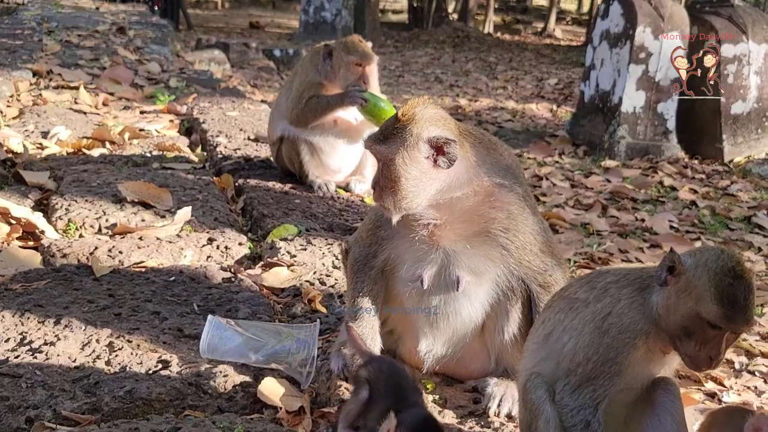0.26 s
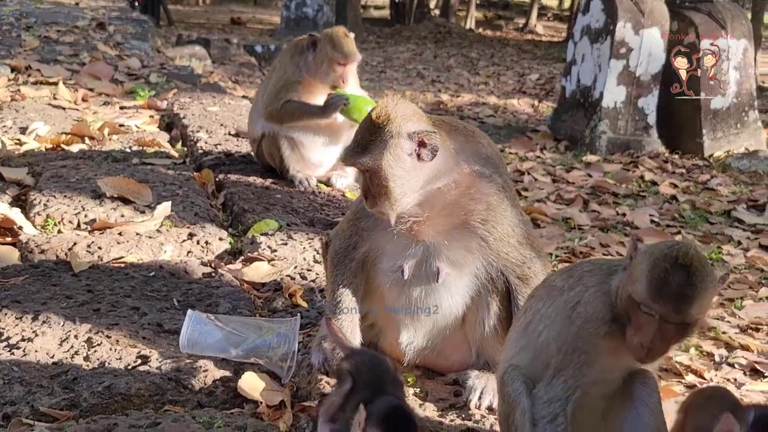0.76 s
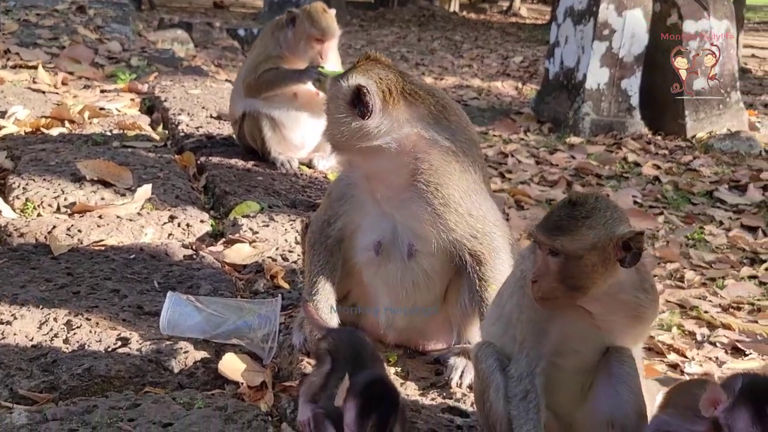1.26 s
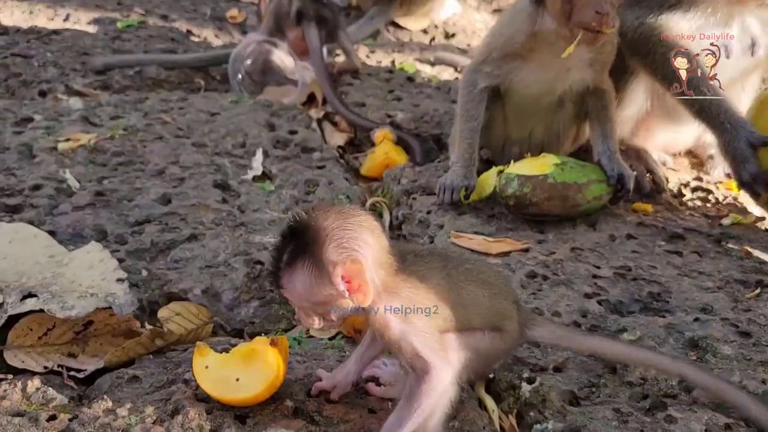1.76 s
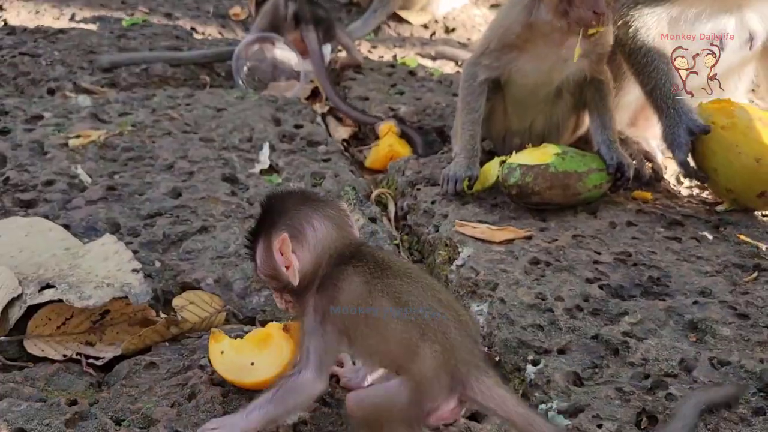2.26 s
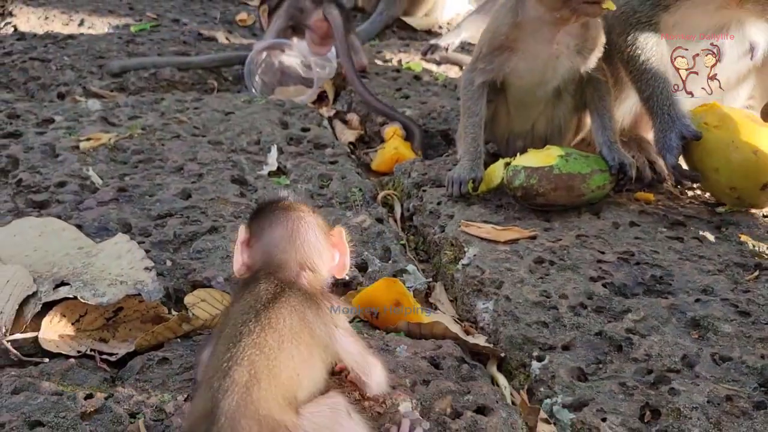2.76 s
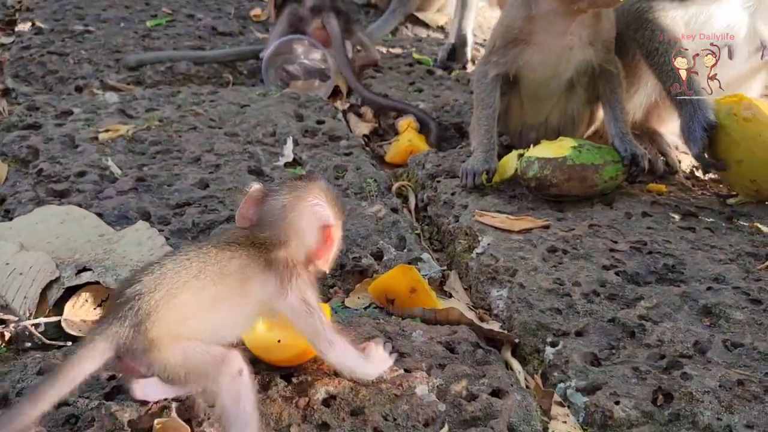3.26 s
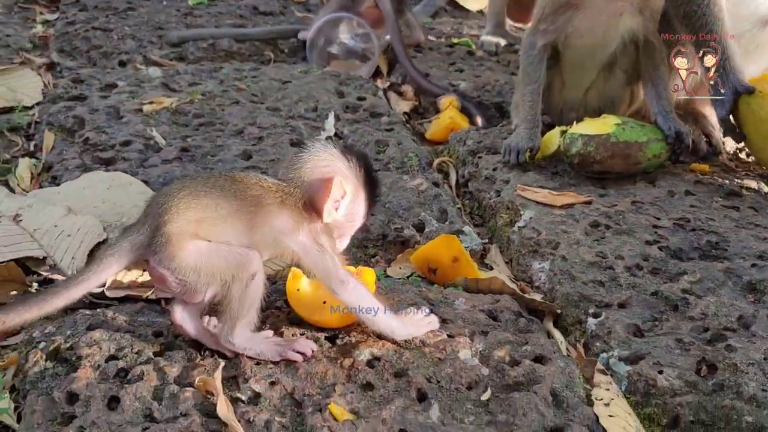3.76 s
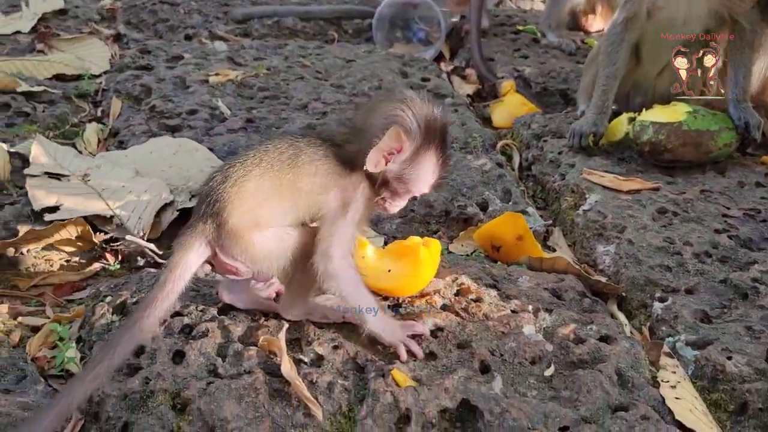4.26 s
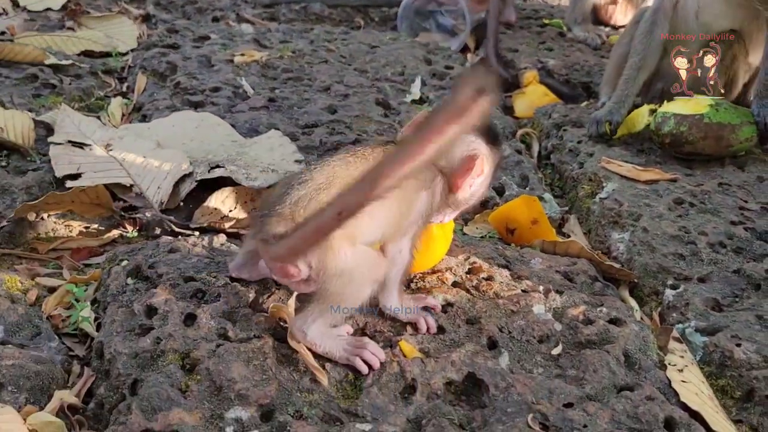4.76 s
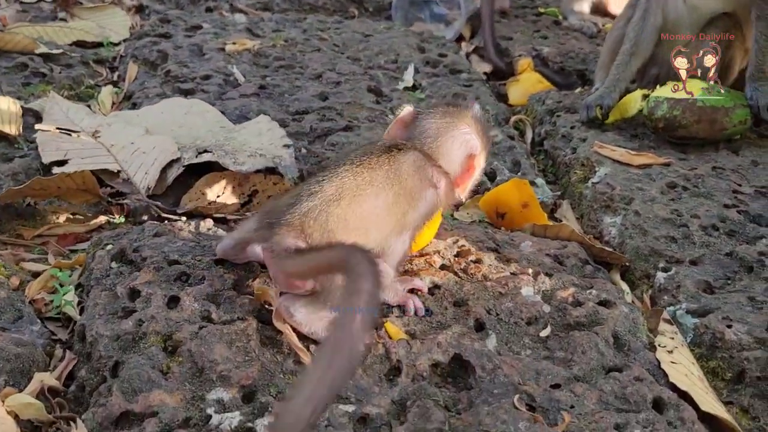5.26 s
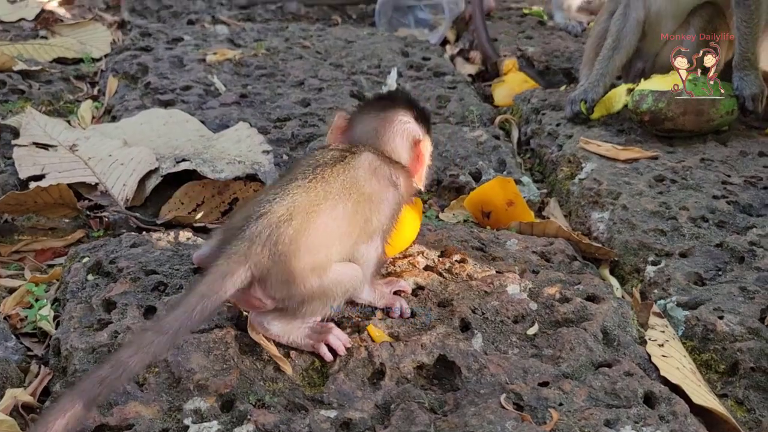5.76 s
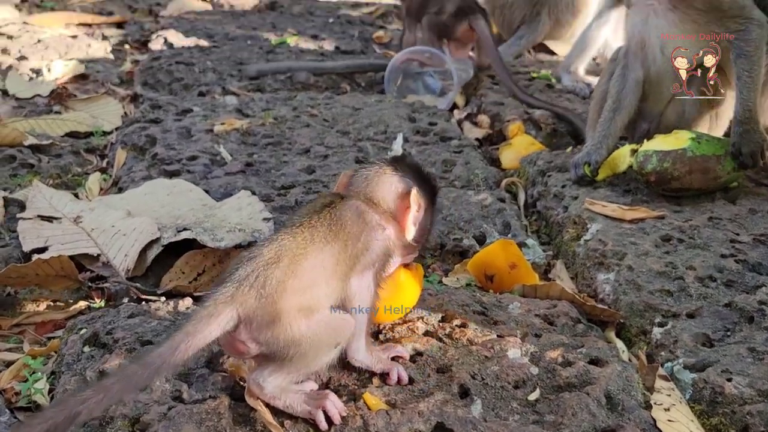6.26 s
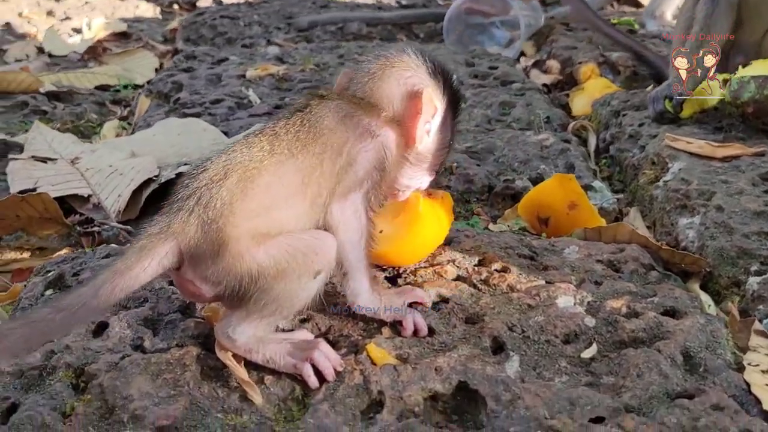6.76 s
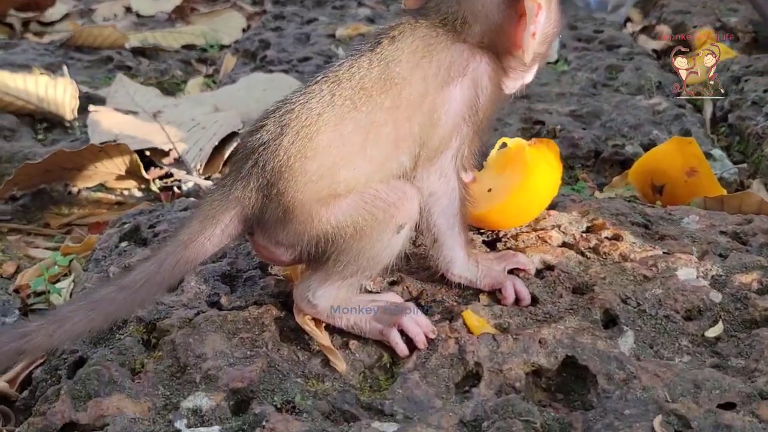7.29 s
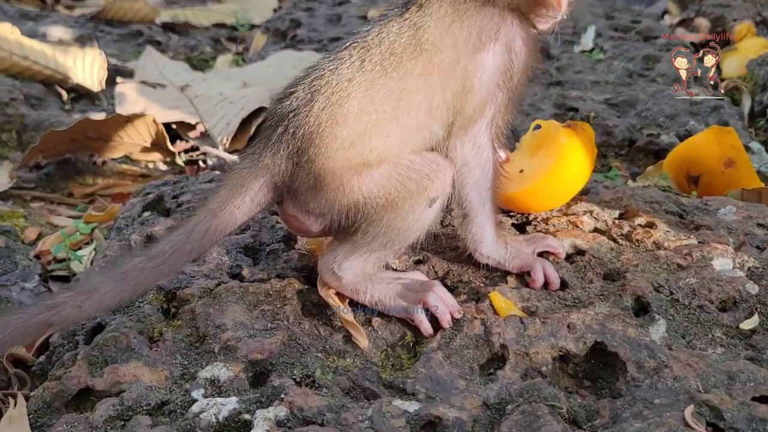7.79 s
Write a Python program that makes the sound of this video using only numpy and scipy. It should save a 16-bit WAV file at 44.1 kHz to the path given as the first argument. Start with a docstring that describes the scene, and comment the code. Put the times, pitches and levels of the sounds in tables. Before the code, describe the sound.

Quiet woodland ground, close up: dry leaves crackle, sharp clicks break out, mouths smack fruit, a young monkey coos briefly, and insects buzz behind.

```python
"""A stone slab among dry leaves in woodland, where macaques feed close to a phone held low.
Near it, leaf strokes are crackling noise, snaps are noise bursts with ringing twigs, taps are decaying modes;
mouths and paws smack in narrow noise, wet peel squeaks and bumps thud as short tones, a young monkey coos once
in harmonics. Beyond, a bird whistles dipping tones and one insect ticks in rasps of noise while another hisses;
shaped noise makes the rustle further off, the air in the trees and the low rumble."""
import sys
import numpy as np
from scipy import signal
from scipy.fft import rfft, irfft, next_fast_len
from scipy.io import wavfile
from scipy.ndimage import uniform_filter1d

SR = 44100
rng = np.random.default_rng(int(sys.argv[2]) if len(sys.argv) > 2 else 0)


def output_pcm(signal):
    """Save a mono or channel-first signal as 16-bit PCM at the path in sys.argv[1].

    Samples are clipped to [-1, 1] before scaling.
    """
    pcm = np.clip(np.atleast_2d(signal).T, -1, 1) * 32767
    wavfile.write(sys.argv[1], SR, np.round(pcm).astype(np.int16))


N = 354119
TIME = np.arange(N) / SR
HIT_SIZE = 4096  # samples in a short sound
HIT_TIME = np.arange(HIT_SIZE) / SR
LONG_HIT_TIME = np.arange(4 * HIT_SIZE) / SR


def amp(db):
    """Decibels to gain."""
    return 10 ** (np.asarray(db) / 20)


def unit(x):
    """Scale to rms 1."""
    return x / np.sqrt(np.mean(x ** 2) + 1e-20)


def burst(x):
    """Scale a short sound to the energy of 10 ms at rms 1."""
    return unit(x) * np.sqrt(.01 * SR / x.shape[-1])


def curves(table):
    """Each column of a table of (seconds, ..) rows at every sample."""
    s, *columns = np.transpose(table)
    return [np.interp(TIME, s, column) for column in columns]


def over_hz(points, size):
    """A (Hz, value) table at the bins of a spectrum, joined along log frequency."""
    hz, value = np.transpose(points)
    return np.interp(np.log(np.fft.rfftfreq(size, 1 / SR) + 1), np.log(hz), value)


def colour(x, points):
    """Filter by a (Hz, dB) spectrum."""
    size = next_fast_len(x.shape[-1])
    return irfft(rfft(x, size) * amp(over_hz(points, size)), size)[..., :x.shape[-1]]


def band(x, lo_hz, hi_hz, order=2):
    """Causal band-pass."""
    return signal.sosfilt(signal.butter(order, [lo_hz, hi_hz], "band", fs=SR, output="sos"), x)


def pan(db):
    """Left and right gains, left minus right in dB, of equal total power."""
    gains = amp(np.array([[.5], [-.5]]) * db)
    return gains / np.sqrt(np.mean(gains ** 2, axis=0))


def ears(phase):
    """Phase in radians at the left and right ports, which a sound reaches out of step."""
    return np.array([[0], [phase]])


def walk(rate):
    """Smooth random wander of rms 1, drawn afresh about rate times a second."""
    k = max(int(SR / rate), 2)
    return unit(uniform_filter1d(np.repeat(rng.standard_normal(N // k + 1), k), k)[:N])


def waver(x, drift, rate):
    """Let the pitch of a stereo sound wander by the share drift."""
    at = np.arange(N)
    warped = at + np.cumsum(drift * walk(rate))
    return np.array([np.interp(warped % N, at, channel) for channel in x])


def swell(s, half):
    """A smooth rise and fall around time s."""
    return np.exp(-((TIME - s) / half) ** 2 / 2)


def phrases(table):
    """Gain of a voice that grows, holds and fades at steady dB rates in each phrase."""
    gains = []
    for start, end, db, rise, fall in table:
        before, after = np.maximum(start - TIME, 0), np.maximum(TIME - end, 0)
        gains.append(amp(db - rise * before - fall * after))
    return np.max(gains, axis=0)


def crackle(rate, spread_db):
    """Dense tiny crackles, rate of them a second on average, whose sizes vary by spread_db."""
    struck = rng.random(N) < rate / SR
    sizes = amp(spread_db * np.minimum(rng.exponential(size=N), 5)) * struck
    envelope = np.sqrt(np.abs(uniform_filter1d(sizes ** 2, size=24)))
    return unit(envelope * rng.standard_normal((2, N)))


def add(out, s, sound):
    """Mix a short sound in at time s."""
    i = int(s * SR)
    out[:, i:i + sound.shape[1]] += sound[:, :N - i]


# How alike the two ports hear sound from all round. Each row: frequency in Hz, correlation.
PORT_LIKENESS = [(130, .75), (290, 0), (640, -.6), (1400, -.6), (3100, 0), (15000, 0)]


def diffuse():
    """Stereo noise arriving from all round, as mid and side balanced by the likeness of the ports."""
    size = next_fast_len(N)
    mid, side = rfft(rng.standard_normal((2, size)))
    alike = np.clip(over_hz(PORT_LIKENESS, size), -1, 1)
    mid, side = mid * np.sqrt(1 + alike), side * np.sqrt(1 - alike)
    return irfft(np.array([mid + side, mid - side]), size)[:, :N]


# Spectrum of the deep rumble. Each row: frequency in Hz, relative level in dB.
RUMBLE_COLOUR = [(20, -48), (27, -26), (34, 0.5), (46, -7), (70, 3), (100, -3.5), (130, -7), (160, -10),
                 (200, -17.5), (300, -27), (500, -73)]
# Its swells. Each row: strongest moment in seconds, level in dB, half length in seconds.
RUMBLE_SWELLS = [(1.856, -48, 0.043), (2.058, -41.5, 0.051), (2.437, -45, 0.11), (2.924, -48.5, 0.07),
                 (3.086, -43, 0.009), (3.43, -47.5, 0.024), (4.16, -49.5, 0.042), (5.135, -45, 0.027),
                 (5.375, -45, 0.045), (5.532, -44.5, 0.04), (6.05, -47.5, 0.025), (6.326, -41, 0.044),
                 (6.48, -46.5, 0.035), (7.785, -46.5, 0.014), (8.023, -42, 0.024)]


def rumble():
    """A deep outdoor rumble, low noise that swells now and then over a steady floor."""
    power = amp(-52) ** 2 + sum((amp(db) * swell(s, half)) ** 2 for s, db, half in RUMBLE_SWELLS)
    return unit(colour(diffuse(), RUMBLE_COLOUR)) * np.sqrt(power) * pan(.057)


# Spectrum of the distant foliage. Each row: frequency in Hz, relative level in dB.
FOLIAGE_COLOUR = [(200, -1.5), (450, 1.5), (750, 2.5), (1200, -1.5), (2150, -6), (2700, -4.5), (3600, -11),
                  (4600, -15), (7300, -18), (9600, -19), (13000, -20.5), (15800, -26)]


def foliage():
    """Distant stirring foliage, a broad soft noise whose level wanders."""
    return unit(colour(diffuse(), FOLIAGE_COLOUR)) * amp(-61.5 + 1.3 * walk(12)) * pan(-1.5)


# Low wash of air in the trees. Each row: time in seconds, level in dB before the gain.
WASH = [(0, -68.5), (1.75, -106), (2.21, -66.5), (4.34, -70), (5.39, -59.5), (6.3, -63.5), (6.64, -74),
        (7.29, -64), (8.03, -77)]


def air_in_trees():
    """Air in the trees, a low band of noise that comes and goes."""
    gain_db, wander_db = 4, 2
    level_db, = curves(WASH)
    return unit(band(diffuse(), 212, 369)) * amp(level_db + gain_db + wander_db * walk(5.1)) * pan(-1.5)


# Rustling further off. Each row: strongest moment in seconds, level in dB before the gain,
# centre in Hz, half length in seconds.
STIRS = [(0.03, -64, 1440, .05), (0.08, -67, 1640, .07), (0.313, -67.5, 2920, 0.11),
         (0.21, -59.5, 1700, 0.043), (0.353, -58, 1750, .06), (0.443, -55.5, 1710, .02),
         (0.37, -61.5, 970, .09), (0.52, -56, 1160, 0.027), (0.619, -58, 1410, 0.036),
         (0.63, -61, 1040, 0.065), (0.77, -49.5, 1070, 0.043), (1.524, -71, 3650, 0.32),
         (1.838, -58, 777, 0.086), (2.59, -62.5, 1200, 0.12), (3.02, -62, 1216, 0.23)]


def stirs():
    """Other monkeys shift about further off: soft, narrow swells of rustle that waver and break into patches."""
    width, drift = 1.08, .02  # band edges as a ratio to the centre, share of pitch
    gain_db, patchy_db = -1, 1.8
    out, noise = 0, diffuse()
    for s, db, hz, half in STIRS:
        rustle = unit(waver(band(noise, hz / width, hz * width), drift, rate=16))
        out = out + rustle * amp(db + gain_db + patchy_db * walk(24.13)) * swell(s, half)
    return out * pan(-7.5)


# Thin high hiss of a second insect. Each row: strongest moment in seconds, level in dB, half length in seconds.
SHRILL_SWELLS = [(5.95, -64, 0.53), (5.485, -57, .07), (5.662, -51.5, 0.028), (5.82, -58, 0.052),
                 (6.03, -52, 0.032), (6.235, -50, 0.025), (6.314, -50, 0.048), (6.42, -53, .045)]


def shrill():
    """A very high, grainy insect hiss that comes in swells, its narrow band drifting a little."""
    centre_hz, width_hz, drift = 13650, 520, .007
    grains = crackle(rate=1500, spread_db=2)
    grains = band(grains, centre_hz - width_hz / 2, centre_hz + width_hz / 2)
    # shift the whole band up and down by a wandering number of Hz
    shift = np.exp(2j * np.pi * np.cumsum(centre_hz * drift * walk(12)) / SR)
    drifting = (signal.hilbert(grains, next_fast_len(N))[:, :N] * shift).real
    effort = np.sqrt(sum((amp(db) * swell(s, half)) ** 2 for s, db, half in SHRILL_SWELLS))
    return unit(drifting) * effort * pan(-.41)


# The rasps of one wing stroke. Each row: delay into the stroke in seconds, relative level in dB,
# share that reaches the ring in dB, favoured pitch in Hz, fall away from it in dB per octave, fade in seconds.
WING_RASPS = [(0, 4.5, -4, 9800, 6, .003), (0.012, 2.5, -9.5, 7700, 22, .005), (.026, -8, 0, 9000, 6, .005)]


def wing_strokes():
    """Slightly uneven strokes: the sample and the force in dB of each rasp, one row a stroke."""
    stroke_s, first_s, jitter_s, scatter_db = .04363, .004, .0006, 2
    starts = np.arange(first_s, TIME[-1] - stroke_s, stroke_s)[:, None]
    late, rasp_db = np.transpose(WING_RASPS)[:2]
    shape = len(starts), len(late)
    times = starts + late + jitter_s * rng.standard_normal(shape)
    at = (np.clip(times, 0, TIME[-1]) * SR).astype(int)
    return at, rasp_db + scatter_db * rng.standard_normal(shape)


# Resonances of the wings. Each row: centre in Hz, width in Hz, relative level in dB.
WING_MODES = [(5100, 900, -6), (6500, 600, -8), (7280, 380, 0), (7750, 400, 1), (8550, 500, 0),
              (9220, 450, 1), (10000, 450, -2), (11000, 450, -11), (12350, 700, -4), (13600, 700, -6)]


def wing_chirr(at, force_db):
    """Each rasp sets off noise in the wing resonances, which wax and wane; also gives the top one's envelope."""
    rise_s, mode_scatter_db, wax_db = .0003, 3, 2.2
    focus_hz, focus_db, fade_s = np.transpose(WING_RASPS)[3:]
    fades = (1 - np.exp(-HIT_TIME / rise_s)) * np.exp(-HIT_TIME / fade_s[:, None])
    chirr = 0
    for hz, width, db in WING_MODES:
        favour_db = db - focus_db * np.abs(np.log2(hz / focus_hz))
        uneven_db = mode_scatter_db * rng.standard_normal(at.shape) + wax_db * walk(5)[at]
        sizes = amp(force_db + favour_db + uneven_db)
        envelope = np.zeros((1, N))
        for stroke, k in np.ndindex(at.shape):
            add(envelope, at[stroke, k] / SR, sizes[stroke, k] * fades[k:k + 1])
        noise = unit(band(rng.standard_normal((2, N)), hz - width / 2, hz + width / 2))
        chirr = chirr + envelope * noise
    return unit(chirr), envelope


# Spectrum of the hiss scattered by foliage. Each row: frequency in Hz, relative level in dB.
HAZE_COLOUR = [(2300, -12.5), (3100, -12), (3700, -3), (4400, -2.5), (5200, -4), (6700, -1), (7300, -6),
               (8200, -2), (9200, 2.5), (10500, -4), (11700, 0), (12500, 0), (14000, -0.5), (15500, -19)]


def wing_haze():
    """The insect's hiss as the foliage scatters it, flickering slowly and fast."""
    return unit(colour(diffuse(), HAZE_COLOUR)) * amp(-6.5 + walk(4.5) + walk(120))


def wing_drone(envelope):
    """Noise in two bands among the wing resonances, only partly pulsed by the strokes."""
    noise = diffuse()
    drone = band(noise, 7270, 7630) + amp(-3.5) * band(noise, 8650, 9600)
    return unit(drone * np.sqrt(envelope + envelope.mean()))


# Thin ring of the wings. Each row: pitch in Hz, relative level in dB.
WING_RINGS = [(2700, -6.5), (3620, -12)]
# When the ring is heard. Each row: full from and full until in seconds, level in dB,
# rise and fall in dB per second.
RING_PHRASES = [(5.465, 5.5, -60.5, 300, 402), (5.8, 7.1, -65.5, 28, 3), (6.51, 6.65, -59.5, 298, 150),
                (6.765, 6.87, -60, 300, 99), (7.03, 7.04, -63, 400, 300), (7.33, 7.39, -63.5, 298, 300),
                (7.55, 7.61, -61, 320, 198), (7.82, 7.83, -63, 299, 197)]


def wing_ring(at, force_db):
    """Each rasp sets off decaying tones, blurred by the foliage into narrow noise."""
    decay_s, blur_db = .0054, -5
    share_db = np.transpose(WING_RASPS)[2]
    ring, blur, pulses = 0, diffuse(), np.zeros(N)
    pulses[at] = amp(force_db + share_db)
    for hz, db in WING_RINGS:
        tone = np.sin(2 * np.pi * hz * HIT_TIME) * np.exp(-HIT_TIME / decay_s)
        beads = unit(signal.oaconvolve(pulses, tone)[:N])
        ring = ring + amp(db) * (beads + amp(blur_db) * unit(band(blur, hz - 100, hz + 100)))
    return ring * phrases(RING_PHRASES)


# The ticking insect. Each row: full from and full until in seconds, level in dB of the effort,
# its rise and fall in dB per second.
INSECT_PHRASES = [(3.68, 3.85, -69, 34, 23), (4.7, 5.3, -70, 26, 20), (5.76, 5.9, -54, 34, 14),
                  (6.52, 6.83, -49, 13, 16.5)]


def insect():
    """Wings open and close about 23 times a second: three uneven rasps a stroke, haze, drone and a thin ring."""
    effort = phrases(INSECT_PHRASES)
    peak = effort.max()
    share = effort / peak
    at, force_db = wing_strokes()
    chirr, envelope = wing_chirr(at, force_db)
    # haze and drone grow more slowly with effort than the rasps do
    chirr = chirr * peak * share ** 1.15
    haze = wing_haze() * peak * share ** .7
    drone = wing_drone(envelope) * amp(-60) * share ** .4
    return (chirr + haze + drone + wing_ring(at, force_db)) * pan(-7)


# One whole whistle, dipping and rising. Each row: time from its start in seconds,
# pitch in Hz before the note's ratio, relative level in dB.
WHISTLE = [(0, 5800, -16), (.01, 6450, -2), (.05, 5850, 1), (.085, 5300, -7), (.11, 5060, -11),
           (.13, 5250, -6), (.155, 5520, 0), (.18, 6150, -1), (.205, 7000, -9), (.22, 7200, -24)]
# The bird's notes. Each row: start of the whistle in seconds (if sung from its beginning), level in dB
# before the gain, first and last second of the whistle that are sung, speed, pitch ratio.
BIRD = [(2.586, -45, 0, .22, 1, 1), (3.757, -51, 0, .22, 1, 1), (4.17, -64, .15, .22, 1, 1.13),
        (5.798, -56, 0, .11, 3, .97), (5.884, -59.5, 0, .08, 3, .97), (5.968, -54.5, 0, .22, 1, .99),
        (7.085, -64, 0, .08, 1, 1.07), (7.09, -60.5, .11, .19, 1, .97), (7.258, -57.5, 0, .22, 1, 1)]


def bird():
    """A nearly pure whistle, whole or in part; fainter notes come from further off, more scattered by the trees."""
    gain_db, side_db, ear_phase = 5, -6.5, .81
    unsteady, flutter_db = .016, 3  # share of pitch, dB
    near_db, broken_per_db = -45, .25  # notes fainter than this break up more
    echo_s, echo_db, middle_db, echo_follows = .038, -3, -56, .6
    song, scattered = np.zeros((2, 2, N))
    at, hz, db = np.transpose(WHISTLE)
    for s, level_db, first, last, speed, ratio in BIRD:
        t = np.arange(first * SR, last * SR, speed) / SR
        pitch = np.interp(t, at, hz) * ratio * (1 + unsteady * walk(810)[:len(t)])
        broken_db = broken_per_db * (near_db - level_db) * (walk(137)[:len(t)] - .5)
        flutter = flutter_db * walk(87.4)[:len(t)]
        loudness = amp(np.interp(t, at, db) + flutter + broken_db) * signal.windows.tukey(len(t), .1)
        note = np.sin(2 * np.pi * np.cumsum(pitch) / SR + ears(ear_phase)) * loudness * pan(side_db)
        add(song, s + first / speed, note * amp(level_db))
        # the scattered sound fades less with distance than the direct one
        add(scattered, s + first / speed, note * amp(middle_db + echo_follows * (level_db - middle_db)))
    t = LONG_HIT_TIME
    trees = unit(rng.standard_normal((2, len(t))) * np.exp(-t / echo_s)) / np.sqrt(len(t))
    echo = signal.fftconvolve(scattered, trees, axes=1)[:, :N]
    return amp(gain_db) * (song + amp(echo_db) * echo)


# Pitch of the young monkey's coo. Each row: time in seconds, fundamental in Hz.
COO_PITCH = [(5.685, 457), (5.725, 539), (5.742, 702), (5.76, 686), (5.774, 607), (5.8, 577), (5.82, 522),
             (5.85, 505), (5.87, 594), (5.89, 533), (5.92, 330)]
# Its loudness. Each row: time in seconds, fundamental and second harmonic in dB before the gains.
COO_LEVEL = [(5.679, -56, -53), (5.694, -62, -52), (5.726, -45, -51), (5.74, -52, -59), (5.752, -57, -61),
             (5.768, -42, -53), (5.802, -42.5, -52), (5.854, -41.5, -43), (5.884, -41.5, -49),
             (5.915, -60, -62), (5.92, -60, -69)]


def coo():
    """A young monkey's husky coo: a faint rising start, a break, then a firm wavering note, two harmonics strong."""
    gain_db, second_db, third_db, husk_db = 5, -1, -28, -13
    jitter, shimmer_db, second_shimmer_db, edge_s = .045, 1.8, 3.5, .005
    hz, = curves(COO_PITCH)
    first, second = amp(curves(COO_LEVEL))
    inside = np.minimum(TIME - COO_LEVEL[0][0], COO_LEVEL[-1][0] - TIME)
    sung = np.clip(inside / edge_s, 0, 1)
    phase = 2 * np.pi * np.cumsum(hz * (1 + jitter * walk(400))) / SR + ears(1.75)
    husk = amp(husk_db) * unit(band(diffuse(), 250, 960))
    low = first * (np.sin(phase) + amp(third_db) * np.sin(3 * phase) + husk)
    high = second * amp(second_db + second_shimmer_db * walk(140)) * np.sin(2 * phase)
    return (low + high) * sung * amp(gain_db + shimmer_db * walk(160)) * pan(-10.5)


# Weight shifting close by. Each row: start in seconds, level in dB before the slow rise and decay,
# pitch in Hz, decay in seconds.
BUMPS = [(2.215, -28.5, 85, 0.012), (4.688, -30.5, 73, 0.015), (5.52, -47, 84, 0.021),
         (6.279, -33, 78, 0.027), (7.083, -31, 83, 0.0067), (7.427, -37.5, 85.5, 0.041)]


def bumps():
    """Weight shifts close by: a few cycles of deep thud, a decaying low sine."""
    out, t, rise_s = np.zeros((2, N)), LONG_HIT_TIME, .0045
    for s, db, hz, decay in BUMPS:
        envelope = np.exp(-t / decay) * (1 - np.exp(-t / rise_s))
        add(out, s, amp(db) * np.sin(2 * np.pi * hz * t) * envelope * pan(-2.6))
    return out


# Colour of sliding dry leaves. Each row: frequency in Hz, relative level in dB.
LEAF_COLOUR = [(1290, -15.5), (2200, -14), (2730, -8), (3190, -12), (3460, -4.5), (4260, -10), (6700, -3),
               (7340, -8.5), (8580, 0), (9950, -8), (12600, -2), (14200, 0), (15800, -9)]
# Leaves stroked along the ground. Each row: strongest moment in seconds, hiss in dB and
# hollow scrape in dB (both before the gains), half length in seconds.
LEAF_STROKES = [(0.544, -56.5, -54, 0.044), (0.634, -46.5, -57.5, 0.07), (0.805, -44, -55.5, 0.057),
                (0.97, -51, -74, 0.037), (1.198, -49.5, -86, 0.069), (1.543, -71.5, -88, 0.11),
                (1.965, -62.5, -65, 0.04), (2.239, -50.5, -73, 0.013), (3.063, -64, -81, 0.028),
                (5.34, -63.5, -79, 0.062)]


def leaf_strokes():
    """Dry leaves slide in strokes, a fine crackling hiss over a hollow scrape, with faint sliding between."""
    hiss_gain_db, scrape_gain_db = 3, 2
    hiss_flicker_db, scrape_flicker_db, drift = 1.2, 2.9, .09
    bed = np.clip((2.25 - TIME) / .08, 0, 1)  # the faint sliding ends at 2.25 s
    hiss, scrape = amp(-69.5) * bed, amp(-71) * bed
    for s, hiss_db, scrape_db, half in LEAF_STROKES:
        hiss = np.hypot(hiss, amp(hiss_db) * swell(s, half))
        scrape = np.hypot(scrape, amp(scrape_db) * swell(s, half))
    slide = unit(colour(crackle(rate=7900, spread_db=.5), LEAF_COLOUR))
    slide = slide * hiss * amp(hiss_gain_db + hiss_flicker_db * walk(40.83))
    hollow = unit(waver(band(diffuse(), 834, 1306), drift, rate=22))
    hollow = hollow * scrape * amp(scrape_gain_db + scrape_flicker_db * walk(43.05))
    return slide * pan(-2) + hollow * pan(-5)


# Colour of the crackling noise around snaps. Each row: frequency in Hz, relative level in dB.
CRACKLE_COLOUR = [(900, 0), (1500, -0.5), (2800, -1), (4200, -7.5), (9000, -10.5), (15000, -18)]
# Its short swells. Each row: strongest moment in seconds, level in dB, half length in seconds.
CRACKLE_SWELLS = [(2.164, -53, 0.043), (2.179, -28.5, 0.0076), (2.204, -44, 0.037), (2.645, -55, 0.05),
                  (3.025, -48, 0.033), (4.004, -51.5, 0.033), (4.664, -51, 0.055), (5.132, -50, 0.033)]


def crackle_swells():
    """Short swells of crackling noise around some of the snaps."""
    level = sum(amp(db) * swell(s, half) for s, db, half in CRACKLE_SWELLS)
    return unit(colour(crackle(rate=6100, spread_db=1.5), CRACKLE_COLOUR)) * level


# Squeaks of wet peel close by. Each row: strongest moment in seconds, peak in dB before panning,
# pitch in Hz, half length in seconds.
SQUEAKS = [(5.742, -50, 1590, .009), (5.861, -51, 1950, .012), (6.037, -53, 1550, 0.0044),
           (6.036, -50, 2780, .004), (6.18, -51, 1560, 0.012), (6.961, -59, 2090, .004),
           (6.985, -54, 2050, 0.0043)]


def squeaks():
    """Wet peel slips for a moment: a tiny, unsteady note."""
    unsteady = .04  # share of pitch
    out, t, slip = np.zeros((2, N)), HIT_TIME, walk(500)
    for s, db, hz, half in SQUEAKS:
        pitch = hz * (1 + unsteady * np.roll(slip, -int(s * SR))[:HIT_SIZE])
        note = np.sin(2 * np.pi * np.cumsum(pitch) / SR + ears(1.7))
        add(out, s - 3 * half, note * np.exp(-(t / half - 3) ** 2 / 2) * amp(db) * pan(-8))
    return out


# Mouths and paws close by. Each row: strongest moment in seconds, level in dB, centre in Hz,
# half length in seconds, left minus right in dB.
SMACKS = [(2.06, -43, 466, 0.0035, -16), (2.163, -48.5, 1350, 0.035, -3), (2.192, -54, 1190, 0.013, -2),
          (3.591, -44, 905, 0.01, -8.5), (3.622, -38, 990, 0.0046, -5), (3.652, -52.5, 900, 0.01, -2),
          (3.898, -54, 570, 0.0042, -19), (4.055, -54, 570, 0.013, -15), (4.162, -48, 505, 0.012, -26),
          (4.204, -55, 560, 0.0062, -12), (4.59, -46.5, 756, 0.011, 4), (4.608, -35.5, 735, 0.0029, 1),
          (4.641, -52.5, 1070, 0.019, 0), (4.826, -50, 362, 0.0082, -2), (4.852, -44.5, 360, 0.0086, -23),
          (5.508, -30.5, 386, 0.0019, -11.5), (5.524, -40, 427, 0.0079, -5),
          (5.549, -36.5, 435, 0.0021, -6), (5.593, -46.5, 484, 0.0095, 19), (5.851, -33.5, 394, 0.0019, -9),
          (6.039, -43, 416, 0.0082, -5.5), (6.085, -43, 360.0, 0.0081, -7), (6.212, -41, 464, 0.012, -5),
          (6.241, -44, 390, 0.0051, -6), (6.282, -48, 320, 0.015, -14), (6.371, -43.5, 400, 0.017, -6.5),
          (6.395, -28.5, 328, 0.0023, -10), (6.43, -41, 370, 0.0058, -8), (6.959, -51.5, 706, 0.02, 2),
          (6.988, -40.5, 575, 0.0065, -3.5), (7.145, -47.5, 464, 0.02, -9.5), (7.159, -44, 503, 0.0056, -5),
          (7.244, -53.5, 292, 0.018, -26), (7.333, -59.5, 765, 0.049, -2), (7.445, -54, 446, 0.021, -16),
          (7.485, -53, 332, 0.0081, -12)]


def smacks():
    """Soft pulp and paws give way: a brief swell of friction in one hollow resonance, with a little wet edge."""
    width, wet_db, alike = 1.275, -17, -.64  # band edge ratio, dB, correlation of the two ports
    out, t = np.zeros((2, N)), np.arange(2 * HIT_SIZE) / SR
    for s, db, hz, half, side in SMACKS:
        left, own = rng.standard_normal((2, len(t)))
        noise = np.array([left, alike * left + np.sqrt(1 - alike ** 2) * own])
        rub = noise * np.exp(-((t - 2 * half) / half) ** 2 / 3.1)
        sound = unit(band(rub, hz / width, hz * width)) + amp(wet_db) * unit(band(rub, 740, 2900))
        # share the level over twice the half length; start early so the swell peaks near s
        add(out, s - 2 * half - .001, sound * np.sqrt(2 * half / t[-1]) * amp(db) * pan(side))
    return out


# Rings of a dry stick. Each row: pitch in Hz, relative level in dB, time to fall 60 dB in seconds.
STICK_MODES = [(742, 1.5, 0.023), (883, -7, 0.052), (1050, -10.5, .04), (1390, 3.5, 0.02),
               (1810, 10, 0.021), (2084, 6, 0.025), (2360, -7.5, 0.032), (2840, -11, 0.046),
               (3230, -6, 0.028)]
# Rings of a hard bit of husk. Each row: pitch in Hz, relative level in dB, time to fall 60 dB in seconds.
HUSK_MODES = [(662, -10, 0.03), (1140, -5.5, 0.019), (1290, 2, .014), (1444, -1.5, .016), (1793, -7, 0.018),
              (2200, -3, 0.015), (2590, -9, 0.018), (3360, -8.5, .014)]
# Rings of something small and hollow. Each row: pitch in Hz, relative level in dB, time to fall 60 dB in seconds.
TAP_MODES = [(967, -6, 0.048), (3040, 1.5, 0.017), (5220, -3, 0.015), (6340, -3, 0.01), (8700, 3, 0.0091),
             (10700, 4.5, 0.01), (13700, -4, 0.011)]
# Taps and knocks on hard things close by. Each row: start in seconds, level in dB,
# left minus right in dB, the modes that ring.
TAPS = [(0.3877, -43.5, 9, TAP_MODES), (2.173, -12.5, -1, STICK_MODES), (5.131, -16.5, -2, HUSK_MODES)]


def taps():
    """Each struck piece rings briefly in its own modes, reaching the two ports out of step."""
    out, t, rise_s = np.zeros((2, N)), HIT_TIME, .001
    for s, db, side, modes in TAPS:
        ring = 0
        for hz, mode_db, t60 in modes:
            tone = np.sin(2 * np.pi * (hz * t + rng.random()) + ears(2.21))
            ring = ring + amp(mode_db) * np.exp(-np.log(1000) * t / t60) * tone
        add(out, s, burst(ring * (1 - np.exp(-t / rise_s))) * amp(db) * pan(side))
    return out


# Rings of a snapped twig or dry leaf. Each row: pitch in Hz before a small random detuning,
# relative level in dB, time to fall 60 dB in seconds.
TWIG_MODES = [(1169, 2, 0.022), (1380, -5.5, 0.021), (1550, -13, 0.008), (1817, 5.5, 0.013),
              (1910, 0.5, 0.0067), (2795, -1.5, 0.03)]


def twig_ring(t, focus_hz, ear_phase):
    """Decaying twig modes; the place of the break favours those near its focus."""
    detune, focus_db = .015, 9  # share of pitch, dB lost per octave from the focus
    ring = 0
    for hz, db, t60 in TWIG_MODES:
        phase = 2 * np.pi * (hz * (1 + detune * rng.standard_normal()) * t + rng.random())
        gain = amp(db - focus_db * abs(np.log2(hz / focus_hz)))
        ring = ring + gain * np.exp(-np.log(1000) * t / t60) * np.sin(phase + ears(ear_phase))
    return ring


# Sharp snaps and clicks close by. Each row: break in seconds, thump, body, bite, crack and fizz in dB,
# decay in seconds, body focus in Hz, splinter pitch in Hz, left minus right in dB.
SNAPS = [(1.783, -79, -76, -59.5, -82, -71, .003, 1200, 4220, -3),
         (2.057, -51, -50, -84, -84, -83, 0.0089, 910, 3000, -14),
         (2.173, -48, -21, -22, -24.5, -30.5, 0.0028, 2110, 2940, -4),
         (2.2631, -55, -53, -34, -30, -41, 0.00059, 2000, 3720, 3.5),
         (2.6438, -50, -43, -31.5, -25.5, -35, 0.0016, 1370, 4120, 4),
         (3.027, -56, -33.5, -31, -30, -28.5, 0.0018, 1560, 4700, 3),
         (4.0106, -53, -26, -32.5, -38.5, -31.5, 0.0035, 1260, 3090, 7.5),
         (4.66, -62, -51, -54, -49, -43, 0.0058, 900, 3420, -7),
         (4.6844, -66, -25.5, -30, -30.5, -25.5, 0.0021, 1160, 4490, 5),
         (5.131, -34.5, -30, -35.5, -37, -35, 0.0018, 1450, 3200, 4),
         (5.509, -46, -59, -79, -75, -62, 0.0014, 1100, 2680, -18),
         (5.617, -77, -60, -72, -57, -38.5, 0.018, 1200, 4000, 4),
         (5.643, -69, -53, -66, -69, -51, 0.0021, 1720, 2900, -11),
         (5.683, -74, -55, -72, -72, -70, 0.002, 1750, 2580, -4),
         (5.849, -46.5, -45, -59, -53, -57, 0.0015, 1900, 2980, -9),
         (6.549, -78, -76, -56, -54, -58, 0.0041, 1500, 5130, -12),
         (7.074, -52, -78, -75, -61, -51, 0.0036, 1500, 5340, -5)]


def snaps():
    """A dry fibre breaks: a noise burst a few ms long, the ring of twig and splinter, a small thump."""
    lead, rise_s, lead_s, lead_db = .018, .0004, .0057, -19
    tail_db, tail_s, grit_db = -27, .011, -10
    splinter_db, splinter_s, bite_width, ear_phase = -4, .0021, 1.384, 2.03
    out = np.zeros((2, N))
    before, t = np.minimum(HIT_TIME - lead, 0), np.maximum(HIT_TIME - lead, 0)
    attack = 1 - np.exp(-t / rise_s)
    # a faint swell of noise leads into each snap
    lead_in = amp(lead_db) * np.exp(before / lead_s) * (1 + before / lead) * (1 - attack)
    for s, thump, body, bite, crack, fizz, decay, focus_hz, splinter_hz, side in SNAPS:
        release = attack * (np.exp(-t / decay) + amp(tail_db) * np.exp(-t / tail_s))
        fracture = rng.standard_normal((2, HIT_SIZE)) * (lead_in + release)
        splinter = np.sin(2 * np.pi * splinter_hz * t + ears(ear_phase) / 2)
        splinter = burst(splinter * attack * np.exp(-t / splinter_s))
        edge = burst(band(fracture, splinter_hz / bite_width, splinter_hz * bite_width, order=3))
        edge = burst(edge + amp(splinter_db) * splinter)
        spray = amp(crack) * burst(band(fracture, 6020, 8820, order=3))
        spray = spray + amp(fizz) * burst(band(fracture, 10200, 14500, order=3))
        ring = burst(twig_ring(t, focus_hz, ear_phase) * attack)
        grit = amp(grit_db) * burst(band(fracture, 920, 2460))
        wood = burst(band(ring + grit, 870, 5000))
        push = burst(np.sin(2 * np.pi * 200 * t) * np.exp(-t / .0063))
        sound = spray + amp(bite) * edge + amp(body) * wood + amp(thump) * push
        add(out, s - lead, sound * pan(side))
    return out


def scene():
    """The woodland, its insects and bird, and the feeding troop close to the phone."""
    woodland = rumble() + foliage() + air_in_trees() + stirs()
    small_animals = shrill() + insect() + bird()
    feeding = bumps() + leaf_strokes() + crackle_swells() + squeaks() + smacks() + taps() + snaps()
    return woodland + small_animals + coo() + feeding


def record(dry):
    """The phone flattens the tallest peaks and cuts the top above 15800 Hz."""
    ceiling = .38  # full scale is 1
    flattened = ceiling * np.tanh(dry / ceiling)
    return signal.sosfilt(signal.ellip(8, .2, 70, 15800, fs=SR, output="sos"), flattened)


dry = scene()
out = record(dry)
output_pcm(out)
```